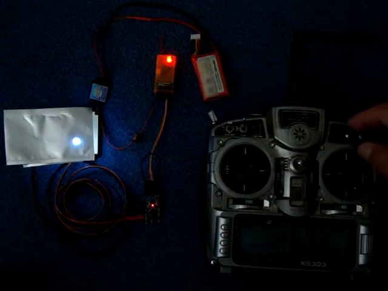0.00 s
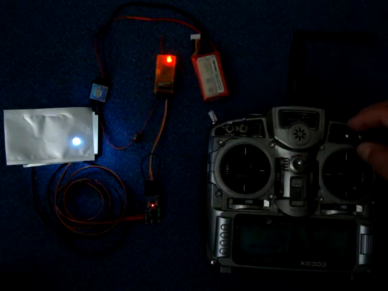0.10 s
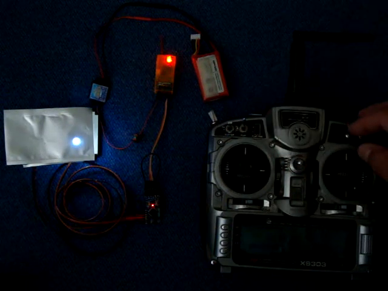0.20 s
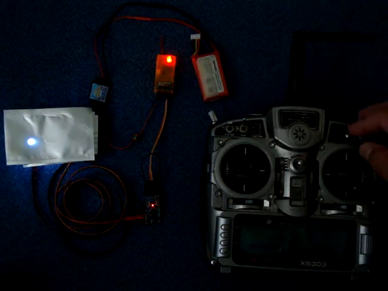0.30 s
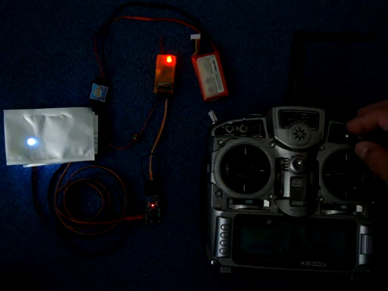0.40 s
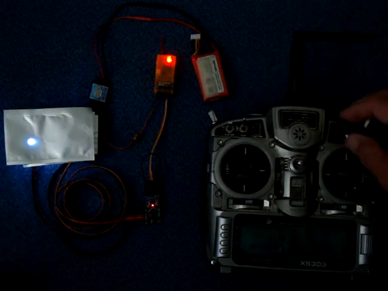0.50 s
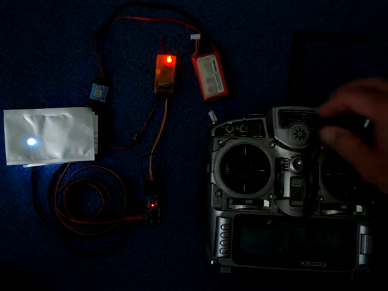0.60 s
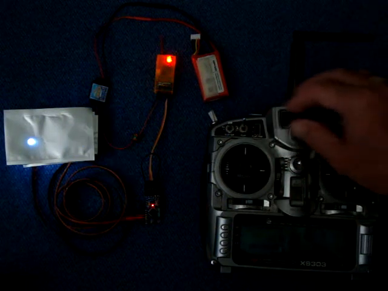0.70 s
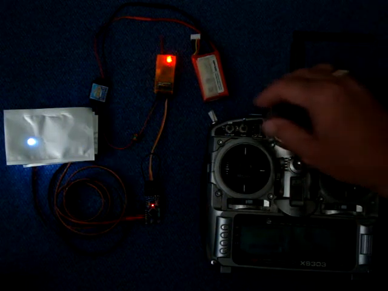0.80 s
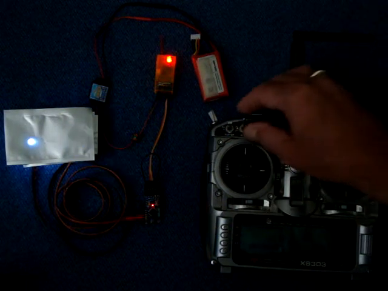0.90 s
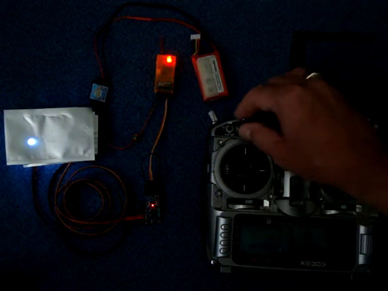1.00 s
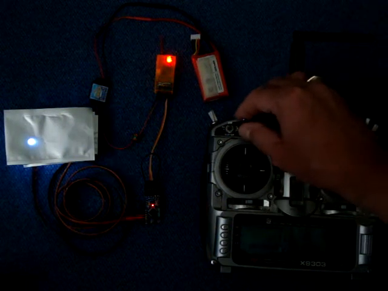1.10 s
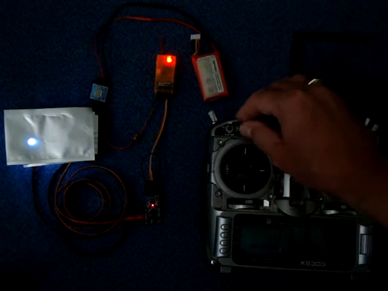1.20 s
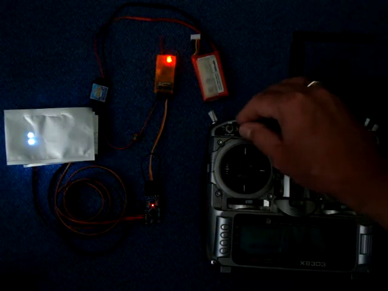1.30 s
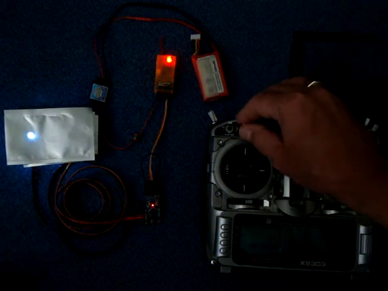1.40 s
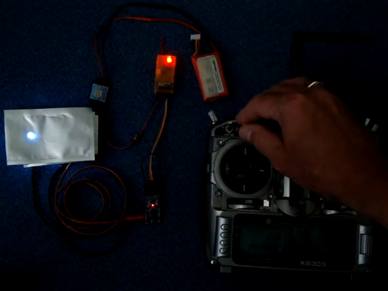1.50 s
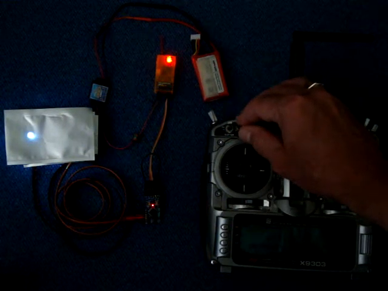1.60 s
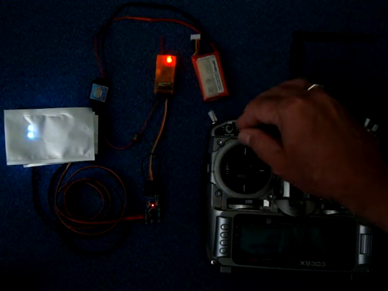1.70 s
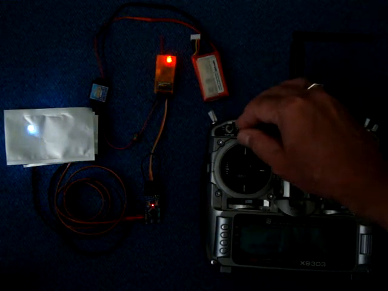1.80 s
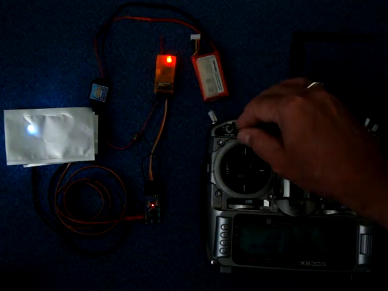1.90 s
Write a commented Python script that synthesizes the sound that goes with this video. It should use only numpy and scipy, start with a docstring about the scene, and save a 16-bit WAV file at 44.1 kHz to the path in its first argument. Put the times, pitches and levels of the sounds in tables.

```python
"""A low hiss and a faint finger touch open the scene; then toggle switches on a plastic radio-control
transmitter are flicked three times in a small, quiet room. Each flick is a thin noise tick as the spring trips,
a sharp snap of banded noise with ringing lever modes, and a knock of decaying sines as the lever lands and
rings the hollow case; the lever then bounces with a faint tick. Fingers add faint noise ticks before and
between the flicks; steady filtered noise makes the hiss."""
import sys
import numpy as np
from scipy import signal
from scipy.fft import rfft, irfft
from scipy.io import wavfile
from scipy.ndimage import uniform_filter1d

SR = 44100
rng = np.random.default_rng(int(sys.argv[2]) if len(sys.argv) > 2 else 0)


def materialize(psi):
    """Save the field psi as 16-bit PCM at rate SR to the path in sys.argv[1].

    A 1-D psi becomes a single channel; in a 2-D psi each row is a channel.
    """
    bounded = np.clip(np.atleast_2d(psi).T, -1, 1)
    quanta = np.round(bounded * 32767).astype(np.int16)
    wavfile.write(sys.argv[1], SR, quanta)


N = 85995
TIME = np.arange(N) / SR

# The flicks: snap t/s, throw, tick level/dB, snap level/dB, lever travel t/s,
# knock level/dB (trims the case modes), thud level/dB, room level/dB (trims the reverberation)
FLICKS = [(0.2200, "right switch", -28.5, -21.5, 0.0044, 1.5, -50, -1.5),
          (1.2599, "left switch, light", -36, -30.5, .0026, -8.5, -47, 0),
          (1.6436, "left switch, firm", -24.5, -24, .0004, 0.5, -59.5, -1.5)]
# Names of the throws, in the order of the level columns in the mode tables
THROWS = ["right switch", "left switch, light", "left switch, firm"]
# Colour of the spring tick: f/Hz, level per Hz/dB
TICK_COLOUR = [(700, -49.5), (2500, -12), (4500, -7), (7000, 5), (8500, -9), (10000, -10.5)]
# Colour of the snap, by throw: f/Hz, level per Hz/dB
SNAP_COLOUR = {"right switch": [(150, -47), (340, -7), (520, -22), (900, -0.5), (1400, -4), (1900, 1.5),
               (2500, -1), (3100, -1.5), (3600, -9), (4500, -13.5), (7000, -19), (10000, -21)],
               "left switch, light": [(150, -27), (340, -10.5), (520, -16), (900, -5), (1350, 3),
               (2100, -3.5), (3300, 4), (4600, -5.5), (7000, -6.5), (10000, -3)],
               "left switch, firm": [(150, -38), (340, -8), (520, -7.5), (900, 8.5), (1400, 4), (1900, 4.5),
               (2500, -0.5), (3100, -9), (3800, -0.5), (4700, -10), (7000, -13.5), (10000, -15)]}
# Decay of the snap: f/Hz, t60/s
SNAP_T60 = [(300, 0.039), (1000, 0.041), (3000, 0.042), (6000, 0.038), (9000, 0.024)]
# Modes of the hollow case: f/Hz, t60/s, level/dB at each of the three throws
CASE_MODES = [(594, 0.19, -56, -61, -41), (674, 0.17, -44.5, -54, -39.5), (825, 0.22, -38.5, -37, -31),
              (909, 0.043, -28, -24, -21.5), (934, 0.041, -21, -28, -26), (1074, 0.019, -7.5, -15.5, -26),
              (1120.6, .06, -23, -28.5, -21), (1191, 0.12, -29, -39, -39), (1318, 0.097, -37, -33, -52),
              (1326, 0.032, -44, -28.5, -46), (1507, 0.13, -33, -48.5, -44), (1682, 0.038, -39, -62, -22.5),
              (1796, 0.13, -49, -39, -29.5), (2095, 0.079, -32, -53, -62), (2314, 0.055, -40, -38, -34)]
# Modes of the lever, rung by the snap: f/Hz, t60/s, level/dB at each of the three throws
LEVER_MODES = [(1500, 0.0069, -22, -47, -50), (2066, .014, -24.5, -52, -39),
               (2547, 0.0088, -18.5, -48, -16.5), (3010, .013, -16.5, -33.5, -42),
               (3600, 0.035, -46, -35, -28.5), (3870, 0.029, -40, -42, -39), (5620, 0.038, -50, -40, -37.5),
               (7180, 0.028, -50, -58, -41), (7700, 0.015, -56, -57, -67)]
# Light finger contacts: t/s, contact, with level and decay: t/s, level/dB, contact, t60/s
TOUCHES = [(0.084, -51.5, "pad", 0.039), (0.6536, -40.5, "nail", 0.011), (0.668, -57, "nail", 0.016),
           (0.686, -53, "nail", 0.039), (1.420, -53, "nail", .04), (1.438, -53, "nail", .04)]
# Colour of a finger contact, by pad or nail: f/Hz, level per Hz/dB
TOUCH_COLOUR = {"pad": [(200, -39.5), (600, -14), (950, 11), (1500, -18), (8000, -41)], "nail": [(300, -23),
                (1600, -28), (2500, 6), (3200, -9), (5000, -2), (7000, -12), (10000, -20)]}
# Decay of the room: f/Hz, t60/s
ROOM_T60 = [(300, 0.4), (1000, 0.2766), (2800, 0.3761), (5000, 0.38), (9000, 9.5)]
# Reverberation against the direct sound: f/Hz, level/dB
ROOM_LEVEL = [(300, -4.5), (1000, -7), (1800, -5), (2800, -12), (5000, -9.5), (9000, -16)]
# Colour of the hiss: f/Hz, level per Hz/dB
HISS_COLOUR = [(15, -50), (25, -18.5), (115, -9.5), (152, -5), (190, -4), (251, -1.5), (331, -0.5),
               (365, -0.5), (404, -1), (470, 0.5), (836, -3), (948, -1.5), (1560, -6.5), (4160, -9.5),
               (10000, -13.5), (13000, -86), (22000, -120)]

TICK_LEAD_S, TICK_T60_S = .002, 0.0058  # the spring tick comes this long before the snap
REBOUND_S, REBOUND_DB = 0.0059, -4  # the lever's bounce, a faint tick: delay after the landing, level against the spring tick
LANDING_CRACK_DB = -10  # noise of the lever's landing against its snap
LEVER_RISE_S, CASE_RISE_S = 0.00058, 0.0019
THUD_HZ, THUD_T60_S = 308, 0.15
CASE_LOW_CUT_HZ = 334
ROOM_DELAY_S, ROOM_BUILD_S, ROOM_BLUR_HZ = .009, 0.0014, 50
HISS_DB = -57.5  # rms
CUTOFF_HZ = 10150


def switches():
    """Each flick and its room tail in place; the case radiates little bass."""
    low_cut = signal.butter(2, CASE_LOW_CUT_HZ, "high", fs=SR, output="sos")
    out = 0
    for s, throw, tick_db, snap_db, travel_s, knock_db, thud_db, room_db in FLICKS:
        tick = spring_tick(tick_db)
        landing = lever_landing(throw, tick_db, snap_db, knock_db, thud_db)
        strike = place(snap(throw, snap_db), 0) + place(lever_ring(throw), 0) + place(landing, travel_s)
        flick = place(tick, 0) + place(strike, TICK_LEAD_S)
        flick = signal.sosfilt(low_cut, flick + 1e-18)  # the tiny offset is inaudible
        out = out + place(flick + from_db(room_db) * room(flick), s - TICK_LEAD_S)
    return out


def spring_tick(db):
    """The spring trips: a thin, very short noise burst."""
    return from_db(db) * burst(TICK_COLOUR, [(1, TICK_T60_S)])


def snap(throw, db):
    """The contact snaps over: a noise burst with the colour of its throw."""
    return from_db(db) * burst(SNAP_COLOUR[throw], SNAP_T60)


def lever_ring(throw):
    """The snap rings the lever's own modes."""
    return rising(ring(LEVER_MODES, throw), LEVER_RISE_S)


def lever_landing(throw, tick_db, snap_db, knock_db, thud_db):
    """The lever lands with a crack, rings the case with a low thud, and bounces once with a faint tick."""
    crack = snap(throw, snap_db + LANDING_CRACK_DB)
    knock = from_db(knock_db) * ring(CASE_MODES, throw)
    case = rising(knock + mode(THUD_HZ, THUD_T60_S, thud_db), CASE_RISE_S)
    rebound = spring_tick(tick_db + REBOUND_DB)
    return place(crack, 0) + place(case, 0) + place(rebound, REBOUND_S)


def fingers():
    """Faint noise ticks as the hand moves over the case."""
    out = 0
    for s, db, contact, t60 in TOUCHES:
        tick = from_db(db) * burst(TOUCH_COLOUR[contact], [(1, t60)])
        out = out + place(tick, s) + place(room(tick), s)
    return out


def room(sound, size=20000):
    """Diffuse tail of one short sound: it takes on that sound's colour and energy, each band with its own decay."""
    power = np.abs(rfft(sound, size)) ** 2
    blurred = uniform_filter1d(power, max(int(ROOM_BLUR_HZ * size / SR), 1))
    colour = np.sqrt(np.maximum(blurred, 0))
    build = 1 - np.exp(-TIME[:size] / ROOM_BUILD_S)
    tail = 0
    for hz, _, band in noise_bands(size):
        band = irfft(rfft(band) * colour, size)
        shaped = band * build * dying(at_hz(ROOM_T60, hz), size)
        level = from_db(at_hz(ROOM_LEVEL, hz)) * band.std()
        tail = tail + level * shaped / np.linalg.norm(shaped)
    return place(tail, ROOM_DELAY_S)


def hiss():
    """Steady room and microphone noise: white noise given a fixed colour."""
    hz = np.maximum(np.fft.rfftfreq(N, 1 / SR), 1)
    colour = from_db(at_hz(HISS_COLOUR, hz)) * (hz < CUTOFF_HZ)
    noise = irfft(rfft(rng.standard_normal(N)) * colour, N)
    return from_db(HISS_DB) * noise / noise.std()


def burst(colour, t60s, size=6000):
    """Many close, short-lived modes struck at once, as dying noise bands; starts at about rms 1."""
    out, power = 0, 0
    for hz, share, band in noise_bands(size):
        fall = dying(at_hz(t60s, hz), size)
        gain = np.sqrt(share) * from_db(at_hz(colour, hz))
        # hold each band's energy steady whatever the random draw
        steady = np.linalg.norm(fall) / np.linalg.norm(band * fall)
        out = out + gain * band * fall * steady
        power += gain ** 2
    return out / np.sqrt(power)


def noise_bands(size):
    """Third-octave bands of unit white noise, as (centre Hz, share of the power, samples)."""
    edges = 140 * 2 ** (np.arange(20) / 3)
    for low, high in zip(edges, edges[1:]):
        sos = signal.butter(2, [low, high], "band", fs=SR, output="sos")
        band = signal.sosfilt(sos, rng.standard_normal(size))
        yield np.sqrt(low * high), 2 * (high - low) / SR, band


def ring(modes, throw):
    """Modes struck together, each as strong as that throw excites it."""
    column = THROWS.index(throw)
    return sum(mode(hz, t60, dbs[column]) for hz, t60, *dbs in modes)


def mode(hz, t60, db, size=16000):
    """One resonance: a decaying sine."""
    return from_db(db) * dying(t60, size) * np.sin(2 * np.pi * hz * TIME[:size])


def rising(sound, rise_s):
    """Soften the start of a sound."""
    return sound * (1 - np.exp(-TIME[:len(sound)] / rise_s))


def dying(t60, size):
    """Exponential decay from 1, down 60 dB after t60 seconds."""
    return from_db(-60 * TIME[:size] / t60)


def place(sound, s):
    """Start a sound at a given time in seconds."""
    return np.pad(sound, (max(int(s * SR), 0), N))[:N]


def at_hz(points, hz):
    """Read a table on a log-frequency axis."""
    f, value = np.transpose(points)
    return np.interp(np.log(hz), np.log(f), value)


def from_db(db):
    """Decibels to gain."""
    return 10 ** (np.asarray(db) / 20)


def scene():
    """Switches and fingers over the hiss, in one channel."""
    return (switches() + fingers() + hiss())[None]


def record(dry):
    """A steep low-pass cuts the top."""
    return signal.sosfilt(signal.ellip(12, .2, 70, CUTOFF_HZ, fs=SR, output="sos"), dry)


dry = scene()
out = record(dry)
materialize(out)
```